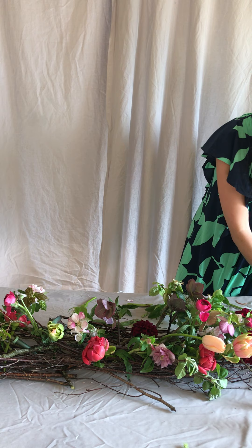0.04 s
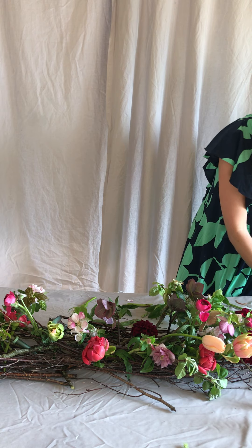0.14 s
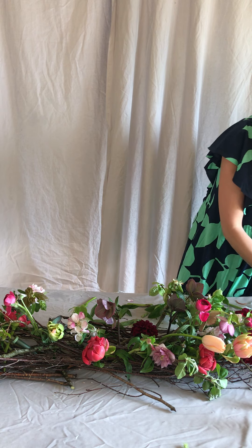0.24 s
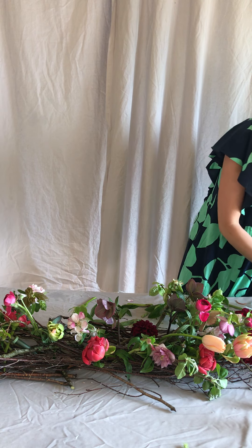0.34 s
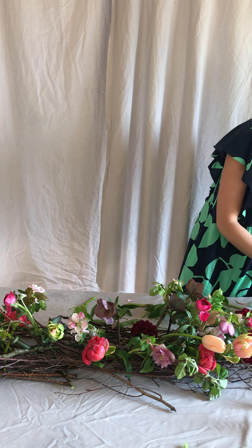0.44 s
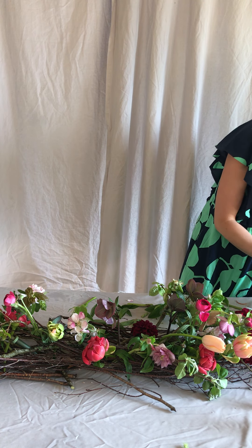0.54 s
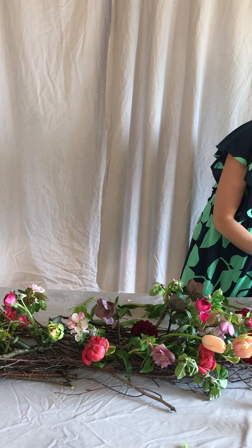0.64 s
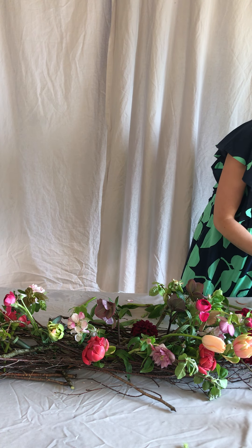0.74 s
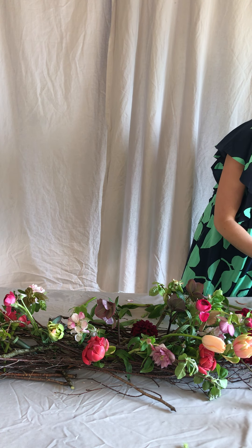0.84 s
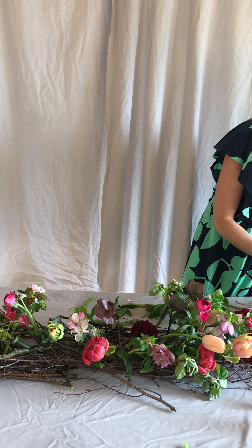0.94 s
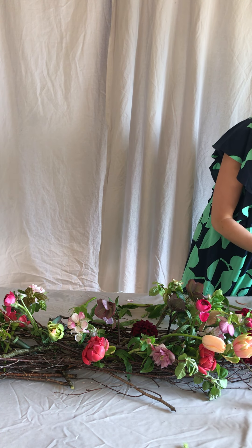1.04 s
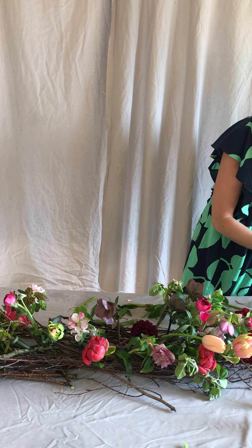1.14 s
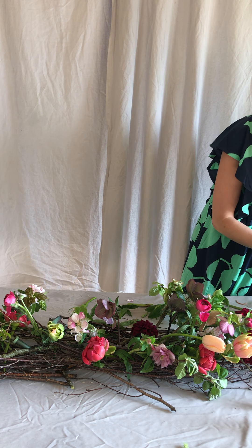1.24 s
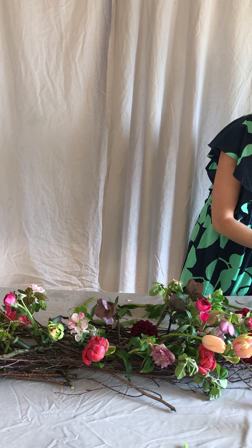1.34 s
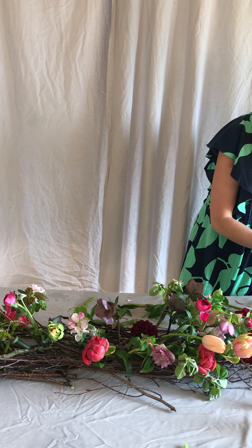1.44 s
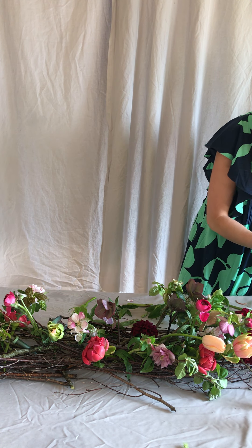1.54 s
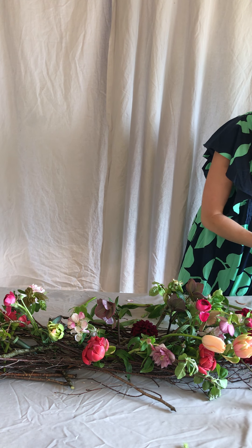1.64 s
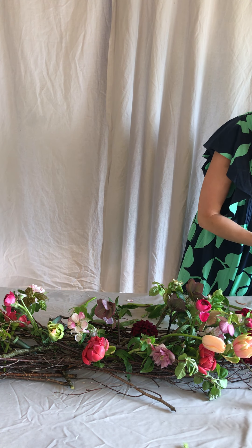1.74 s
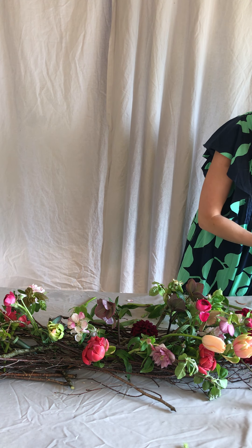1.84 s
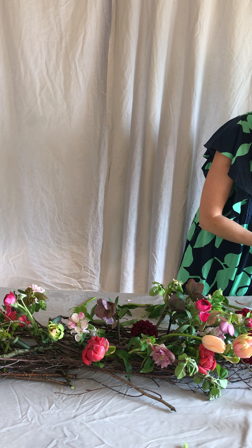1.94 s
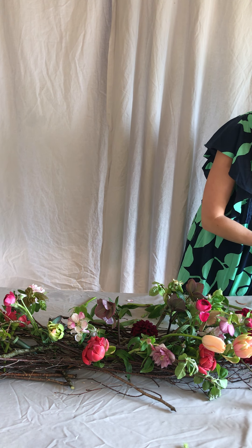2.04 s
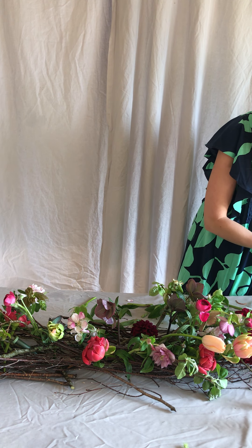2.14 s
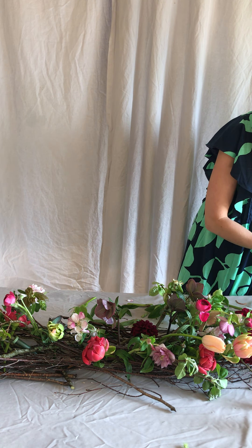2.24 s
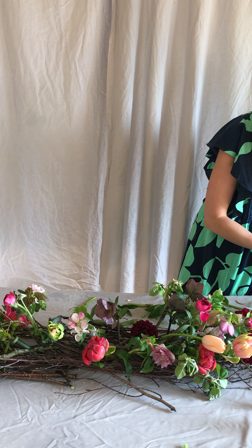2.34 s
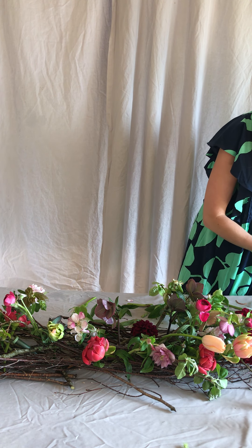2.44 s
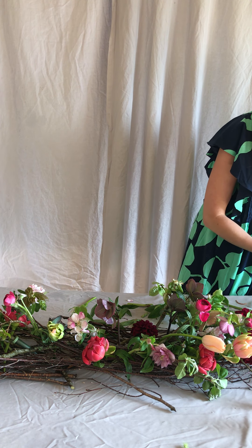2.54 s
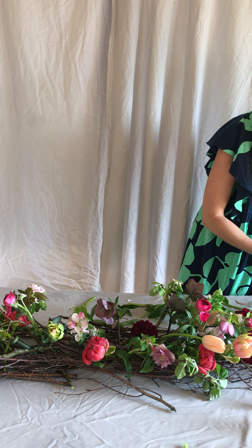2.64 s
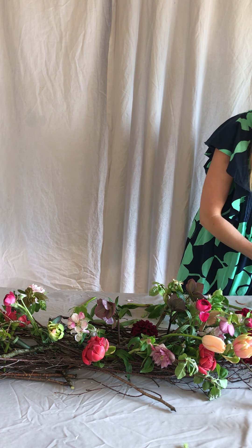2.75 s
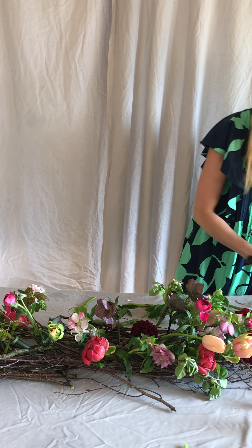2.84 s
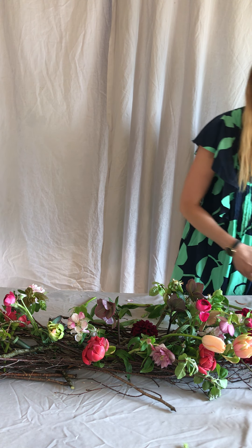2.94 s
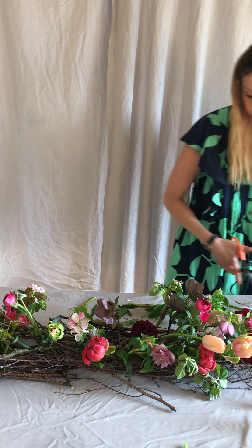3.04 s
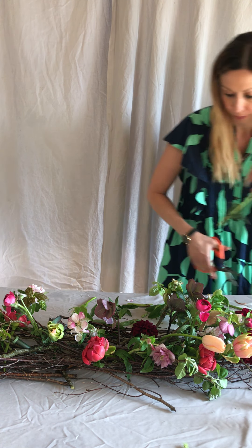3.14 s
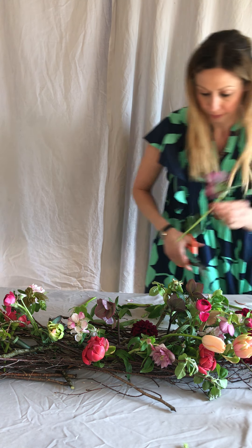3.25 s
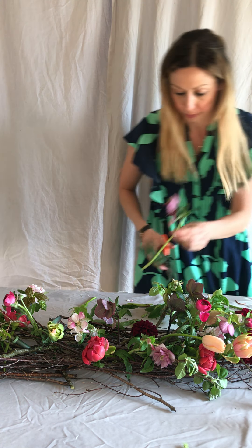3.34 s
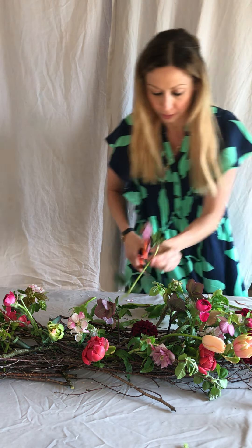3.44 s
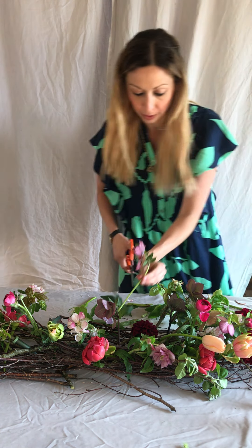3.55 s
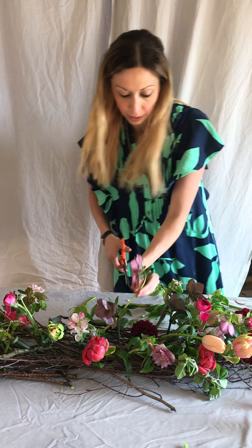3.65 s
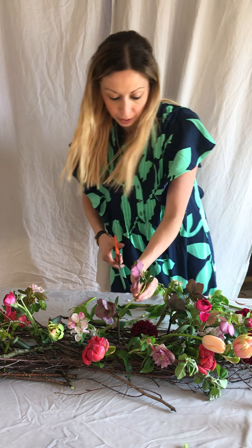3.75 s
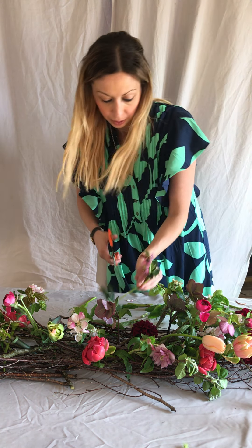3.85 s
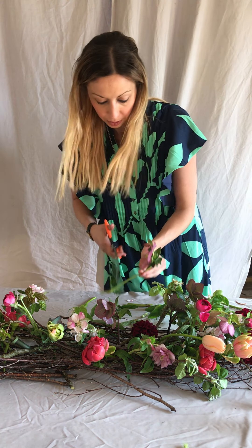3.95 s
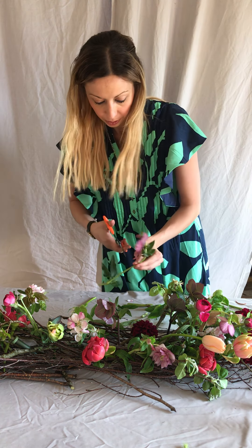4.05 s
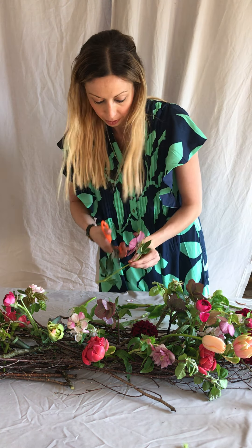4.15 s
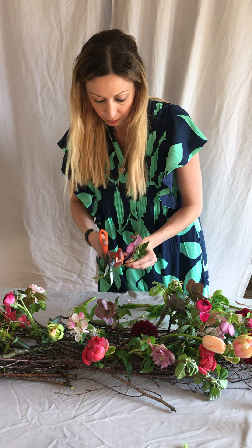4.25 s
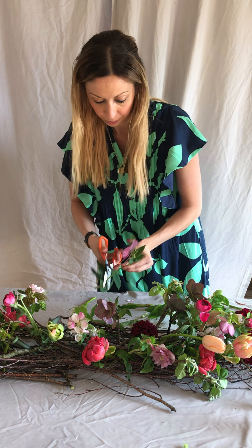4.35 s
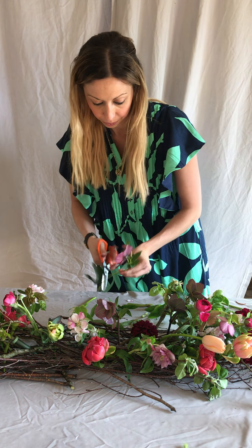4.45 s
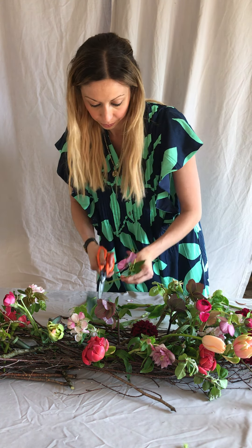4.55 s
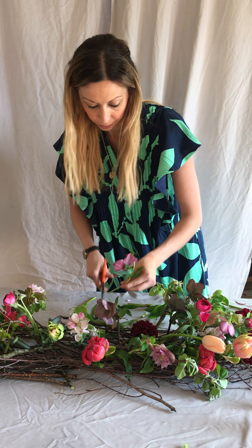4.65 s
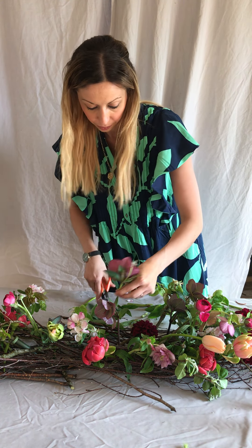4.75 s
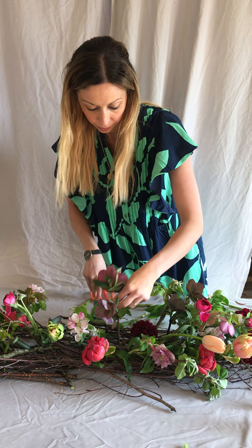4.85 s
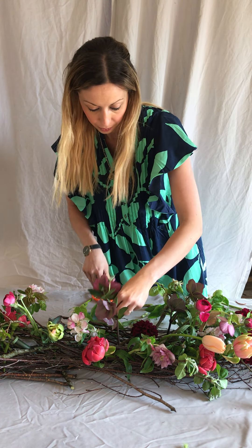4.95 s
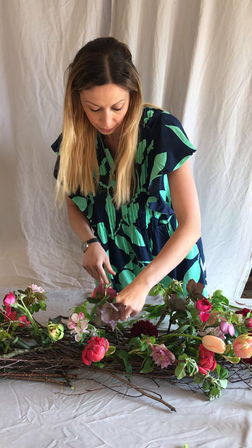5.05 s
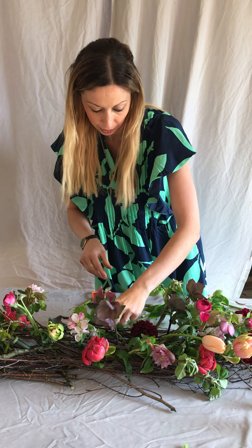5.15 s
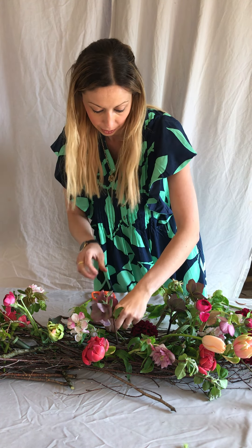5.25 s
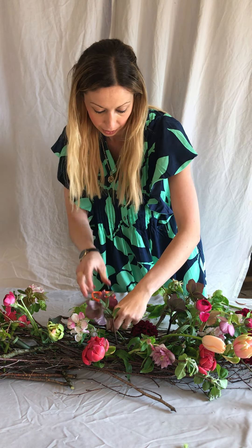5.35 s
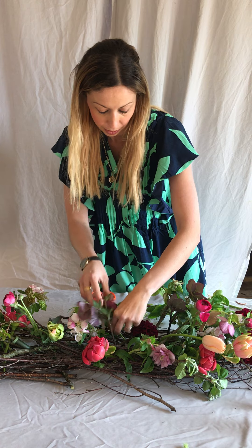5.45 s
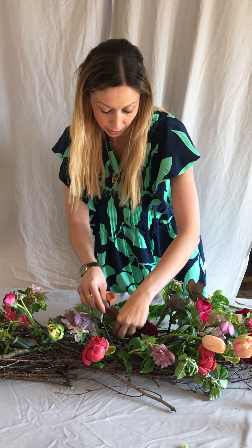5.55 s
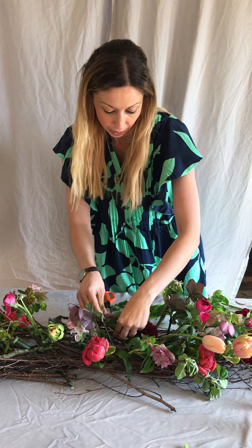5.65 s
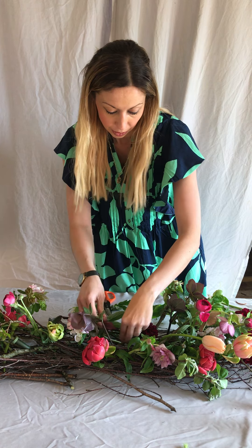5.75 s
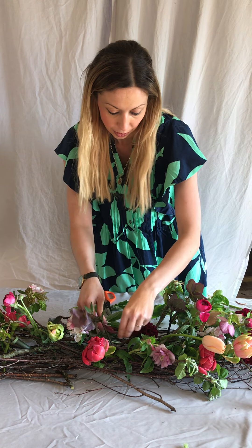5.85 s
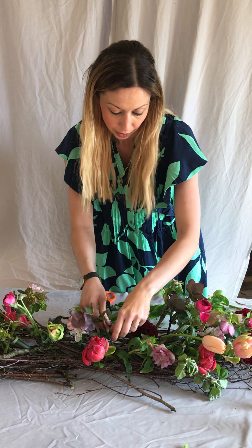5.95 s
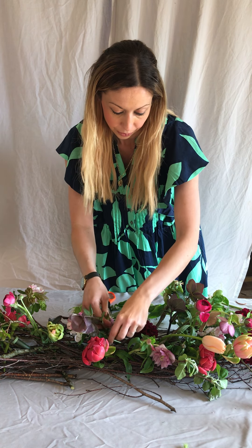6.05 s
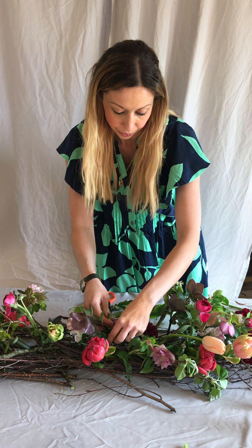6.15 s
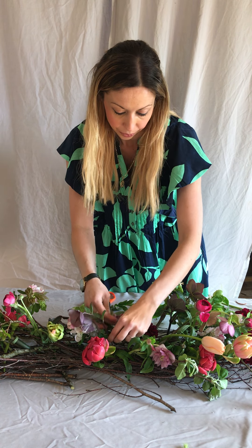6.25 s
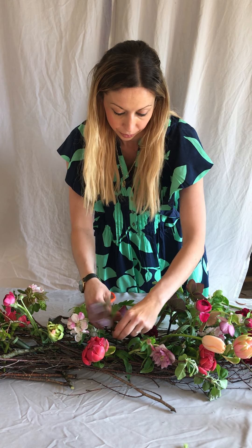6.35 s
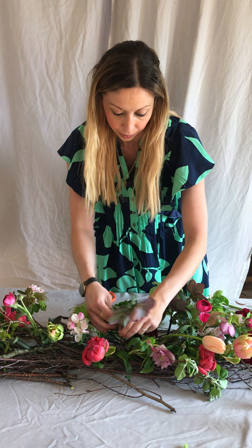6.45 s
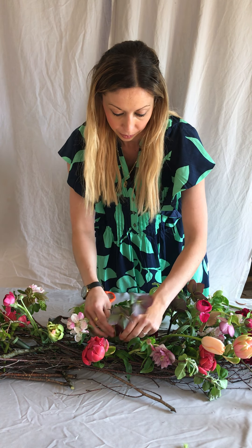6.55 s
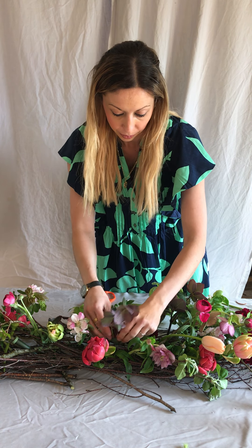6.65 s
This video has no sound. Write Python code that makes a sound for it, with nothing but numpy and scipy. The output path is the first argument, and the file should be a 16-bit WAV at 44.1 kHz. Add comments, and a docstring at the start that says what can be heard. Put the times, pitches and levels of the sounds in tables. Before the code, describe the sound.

Snips crack through flower stems amid faint leaf rustle, then drop and clatter on a table in a bare room.

```python
"""Over a faint hum and hiss, flower stems crack under a pair of snips while leaves and a dress rustle.
Each crack is a quick run of breaking fibres; the rustle is thousands of tiny clicks. After faint creaks
and scrapes, a hand thumps the table's board, which rings low. Then the snips are dropped and bounce:
the handles knock and tick, and the loose blades clack. A bare, lively room answers every sound,
and a phone two metres away hears it all."""
import sys
import numpy as np
from scipy import signal
from scipy.fft import rfft, irfft
from scipy.io import wavfile
from scipy.ndimage import uniform_filter1d

SR = 44100
rng = np.random.default_rng(int(sys.argv[2]) if len(sys.argv) > 2 else 0)


def master_out(mix):
    """Clip the mix to full scale and print it as 16-bit PCM to the path in sys.argv[1]."""
    frames = np.transpose(np.atleast_2d(mix))
    ceiling = np.clip(frames, -1, 1)
    pcm = np.round(ceiling * 32767).astype(np.int16)
    wavfile.write(sys.argv[1], SR, pcm)


N = 295359


def gain(db):
    """Turn decibels into a number to multiply by."""
    return 10 ** (np.asarray(db) / 20)


def normalise(x):
    """Scale a sound to an average power of 1."""
    return x / np.sqrt(np.mean(x ** 2))


def read_curve(hz, table):
    """Read between (pitch, value) points, giving every octave equal space."""
    pitches, values = np.array(table).T
    return np.interp(np.log(np.maximum(hz, 1)), np.log(pitches), values)


def band(x, hz, width_hz):
    """One resonance: keep the sound near one pitch."""
    return signal.lfilter(*signal.iirpeak(hz, hz / width_hz, fs=SR), x)


def dull(x, top_hz):
    """Gently soften the treble, from 19000 Hz at the highest."""
    return signal.lfilter(*signal.butter(1, min(top_hz, 19000), fs=SR), x)


def cut_bass(x, hz, order):
    """Remove the lows; a higher order cuts more steeply."""
    return signal.sosfilt(signal.butter(order, hz, "high", fs=SR, output="sos"), x)


def add(track, start_s, sound):
    """Mix a sound into a track at the given time."""
    i = int(start_s * SR)
    track[i:i + len(sound)] += sound[:N - i]


def impacts(ms, clean_start=False):
    """A dying run of tiny impacts that favours no pitch; a clean start adds one opening click."""
    fade = np.exp(-np.arange(4096) / (SR * max(ms, .15) / 2000))
    fade /= np.linalg.norm(fade)
    run = rng.standard_normal(len(fade)) * fade
    if clean_start:
        run[0] += 1 / np.sqrt(max(ms, 1))  # stands out less in a long run
    ceiling = np.abs(run) + .4 * fade
    ceiling /= np.linalg.norm(ceiling)
    for _ in range(8):  # make all pitches equally strong, then bring back the fading shape
        spectrum = rfft(run)
        run = irfft(spectrum / (np.abs(spectrum) + 1e-12), len(fade))
        run = np.clip(run, -ceiling, ceiling)
    return run / np.linalg.norm(run)


# The tone of the background noise: (pitch [Hz], relative level [dB])
HUM_TONE = [(15, -25.5), (25, 1.5), (87, 0.5), (259, -8), (313, -5.5), (399, -14), (687, -10.5),
            (1280, -18.5), (1980, -17), (10400, -27.5), (14000, -21), (15200, -23.5), (16500, -27)]
def hum_and_hiss(level_db=-67.5):
    """The house hums and the microphone hisses, both steadily."""
    tone = gain(read_curve(np.fft.rfftfreq(N, 1 / SR), HUM_TONE))
    noise = irfft(rfft(rng.standard_normal(N)) * tone, N)
    return gain(level_db) * normalise(noise)


# Stems cracking, small clicks of the snips, and a faint scrape:
# (time [s], level [dB], brightest pitch [Hz], boost at that pitch [dB], length [ms])
CRACKS_AND_SCRAPE = [(0.023, -48, 12300, 4, 0.47), (0.241, -53.5, 12500, 4, 8), (0.303, -62, 7000, 31, 8.9),
                     (0.359, -56, 4700, 20, 6), (0.39, -60, 3500, 13.5, 5.7), (0.449, -62, 2000, 22, 97),
                     (0.503, -49.5, 5960, 34, 0.73), (0.585, -59, 6500, 15, 3.4),
                     (0.739, -55, 5030, 8, 4.7), (0.755, -58, 3960, 16, 11), (1.163, -54, 12000, 19, 1.6),
                     (1.383, -51.5, 6100, 6, 1.6), (1.464, -48.5, 8200, 2, 4.1), (1.55, -53, 9000, 4, 3.3),
                     (1.604, -56, 3200, 15, 2.6), (1.625, -62, 3300, 12, 3.5), (1.635, -58, 4000, 5, 4.4),
                     (1.65, -67, 7200, 5, 3.5), (1.822, -50, 7600, 9, 0.94), (1.828, -44, 6030, 5, 2),
                     (2.205, -57.5, 7100, 5, 13), (2.5984, -44, 9600, 14, 9.4), (2.612, -45.5, 9500, 7, 12),
                     (2.662, -35.5, 8800, 13, 20), (2.667, -39, 11000, 13, 7.7), (2.669, -33, 6500, 7, 13),
                     (2.6737, -13.5, 12500, 26, 0.97), (2.6732, -21.5, 4820, 9, 1.1),
                     (3.002, -51.5, 3900, 6.5, 8.3), (3.117, -57.5, 7600, 8, 3.7),
                     (3.182, -49, 10200, 8, 1.9), (3.282, -56.5, 6000, 5, 13),
                     (3.406, -54.5, 4300, 31, 5.5), (3.569, -55, 8100, 5, 3.3),
                     (3.924, -58.5, 8150, 30, 2.5), (4.003, -63, 7800, 20, 2),
                     (4.4417, -46.5, 9700, 7, 6.8), (4.459, -45, 9550, 3, 1.1),
                     (4.47, -34.5, 11600, 5.5, 2.2), (4.514, -57, 12380, 8.5, 1),
                     (4.523, -45, 10080, 8.5, 33), (4.53, -33, 12760, 8.5, 1.7),
                     (4.5417, -28, 10660, 6, 3.2), (4.545, -46, 4500, 11, 11.4),
                     (4.8083, -41.5, 6000, -3, 3), (5.091, -54.5, 13300, 6, 7.3),
                     (5.584, -54, 7030, 1.5, 1.1), (6.047, -62.5, 6450, 14, 20), (6.183, -55, 9100, 0, 1.4),
                     (6.299, -52, 3640, 6, 0.85), (6.120, -66, 4200, 22, 30), (6.371, -50, 3330, 7, 0.91)]
def cracks_and_scrape():
    """Fibres break in a fast run, splintering with one brighter region; the longest run is a scrape."""
    out = np.zeros(N)
    for start_s, db, hz, boost_db, ms in CRACKS_AND_SCRAPE:
        run = impacts(ms, clean_start=True)
        bright = band(band(run, hz, .45 * hz), hz, .45 * hz)
        top_hz = 3.1 * hz
        splinter = dull(dull(cut_bass(run, 2700, order=3), top_hz), top_hz)
        sound = splinter + (gain(boost_db) - 1) * bright
        peak = np.sqrt(2 * np.max(uniform_filter1d(sound ** 2, size=24)))
        add(out, start_s, gain(db) * sound / peak)
    return out


def crackle(per_second, spread_db):
    """Many tiny clicks of uneven size."""
    sizes = gain(spread_db * np.minimum(rng.exponential(size=N), 3)) * rng.standard_normal(N)
    return normalise(sizes * (rng.random(N) < per_second / SR))


def catch_and_slip(per_second=18, depth_db=2.5):
    """A loudness that wanders as leaves catch and slip."""
    hold = int(SR / per_second)
    steps = np.repeat(rng.standard_normal(N // hold + 1), hold)
    wander = uniform_filter1d(steps, size=hold // 2)[:N]
    return gain(depth_db * normalise(wander))


# Movements of leaves and cloth, with levels before the overall trim:
# (time [s], length [s], leaf level [dB], extra crispness [dB], cloth level [dB], floor level [dB])
MOVEMENTS = [(0.057, 0.073, -69.5, 3, -71, -73), (0.267, 0.13, -63.5, 4, -66.5, -70),
             (0.41, 0.17, -68, 2, -79, -63.5), (0.546, 0.17, -71, 5.5, -68, -69),
             (0.673, 0.069, -65.5, 7.5, -67, -68), (0.837, 0.29, -86, 21, -85, -71),
             (1.168, 0.1, -64, 1, -66, -102), (1.402, 0.24, -66.5, 3.5, -70, -67),
             (1.549, 0.11, -73.5, 15.5, -67, -85), (1.662, 0.13, -69, 4.5, -62.5, -65),
             (1.78, 0.11, -66, 3.5, -83, -93), (1.893, 0.19, -64, -4.5, -69, -66),
             (2.173, 0.047, -73, 4, -95, -97), (2.431, 0.032, -65, -8, -65, -95),
             (2.971, 0.033, -75.5, 20.5, -58.5, -69), (3.275, 0.03, -77.5, 9, -64, -80),
             (3.363, 0.15, -65.5, -4, -66, -77), (3.714, 0.05, -83, 13, -84, -82),
             (5.639, 0.21, -85, 16, -73, -88.5), (5.946, 0.17, -91, 21, -93, -95.5),
             (6.101, 0.023, -88, 24, -94, -81), (6.367, .03, -80, 0, -65, -71)]
def rustle(trim_db=-10, settle_s=0.029):
    """Leaves crackle, cloth shuffles lower down, and the floor rumbles as weight shifts."""
    t, power = np.arange(N) / SR, np.zeros((4, N))
    for start_s, length_s, leaf_db, crisp_db, cloth_db, floor_db in MOVEMENTS:
        swell_s = 0.016 + 0.16 * length_s  # longer movements swell more slowly
        swell = np.clip((t - start_s) / swell_s, 0, 1)
        settle = np.exp(-np.maximum(t - start_s - length_s, 0) / settle_s)
        levels = gain([leaf_db, leaf_db + crisp_db, cloth_db, floor_db])
        power += np.outer(levels, swell * settle) ** 2
    leaves = crackle(3500, spread_db=2.5) * catch_and_slip()
    soft_leaves = normalise(band(band(leaves, 2520, 3200), 3330, 3845))
    crisp_leaves = normalise(band(band(leaves, 6630, 10660), 6300, 10300))
    cloth = normalise(band(band(crackle(600, spread_db=2), 420, 680), 420, 720))
    floor = normalise(band(band(rng.standard_normal(N), 83, 110), 89, 120))
    layers = np.array([soft_leaves, crisp_leaves, cloth, floor])
    return gain(trim_db) * np.sum(np.sqrt(power) * layers, axis=0)


def push(contact_ms):
    """The force of a touch rises and falls; a longer contact wakes fewer high notes."""
    ms = np.arange(.5, 400) / SR * 1000
    force = np.sin(np.pi * np.minimum(ms / contact_ms, 1))
    return force / force.sum()


def ring(notes, swing=1, detune=0):
    """A struck part's fading notes, never quite the same; a negative swing flips every other one."""
    t = np.arange(int(SR * max(ring_s for _, _, ring_s in notes))) / SR
    spread_db = 1.5 * rng.standard_normal(len(notes))
    shift = 1 + detune * rng.standard_normal(len(notes))
    out = np.zeros(len(t))
    for k, (hz, db, ring_s) in enumerate(notes):
        fade = gain(db + spread_db[k] - 60 * t / ring_s)
        out += swing ** k * fade * np.sin(2 * np.pi * hz * shift[k] * t)
    return out


# The notes of the table's board: (pitch [Hz], relative level [dB], time to fade by 60 dB [s])
BOARD_NOTES = [(119.3, -3.5, 0.23), (137, -3, .25), (152.1, -4.5, 0.32), (168.1, -13.5, 0.58),
               (210, -6, 0.14), (259, -16, 0.22), (280, -17, 0.065), (300, -13, 0.15), (324, -13, 0.13),
               (342.6, -5, 0.074)]
# The notes of the snips' handles: (pitch [Hz], relative level [dB], time to fade by 60 dB [s])
HANDLE_NOTES = [(260, -1.5, 0.012), (407, -10, 0.06), (496, -34.5, 0.032), (592, -8.5, 0.039),
                (687.5, 4, 0.025), (830, -1.5, 0.022), (980, -1, 0.026), (1090, -5.5, 0.024),
                (1296, -1.5, 0.013), (1570, -0.5, 0.0083), (2010, 4, 0.011), (2690, -0.5, 0.019),
                (3050, -7.5, 0.0019)]
# The pitches the blades add to a clack: (pitch [Hz], width [Hz], relative level [dB])
BLADE_TONES = [(1620, 350, 2.5), (2373, 77, 16), (3190, 830, 4), (4450, 350, 2), (5600, 320, 10.5),
               (6200, 550, 8), (7070, 250, 6), (9900, 3100, 3), (13100, 1700, 3.5)]
# Knocks on the table, and faint creaks and scrapes:
# (time [s], board strength [dB], handle strength [dB], clack strength [dB],
# clack treble limit [Hz], extra blade ring [dB], contact time [ms], rattle length [ms])
KNOCKS_AND_CREAKS = [(0.33, -87, -66.5, -90, 2000, 0, 0.46, 30),
                     (0.385, -96, -67.5, -88, 2000, 0, 0.44, 11), (0.462, -90, -68, -90, 2000, 0, 0.53, 18),
                     (0.824, -76, -56, -91, 3000, 0, 0.63, 12.6), (2.675, -89, -49, -83, 2457, -2, 0.86, 2),
                     (2.876, -90, -55, -66, 2000, -1.5, 0.41, 9.7),
                     (3.365, -63, -96, -95, 2000, -2, 1.04, 9.7),
                     (4.149, -35, -57, -27.5, 3000, -5.5, 0.79, 51),
                     (4.526, -94, -62, -31, 2500, 2, 0.072, 15),
                     (4.548, -84.5, -68, -76.5, 3000, -11, 0.76, 17),
                     (4.629, -71.5, -50.5, -59, 1990, -2, 0.52, 35),
                     (4.715, -78.5, -81, -92, 2005, 4, 0.59, 53),
                     (4.799, -67, -44, -75, 1983, 4.5, 1.2, 28),
                     (4.8078, -46.5, -24.5, -15, 3000, 7, 0.78, 3),
                     (4.8156, -55, -23.5, -42, 1990, -16, 0.78, 1.55),
                     (4.838, -72, -47, -68.5, 1500, -8, 0.63, 1.3),
                     (4.873, -75, -43, -66.5, 1460, 1, .8, 2),
                     (4.882, -50.5, -33, -64, 1500, 4, 0.42, 0.67),
                     (4.905, -77, -43, -64.5, 1500, 3, .9, 2),
                     (4.9412, -35.5, -32.5, -22.5, 5460, 5, 0.19, 4),
                     (4.9445, -47, -24.5, -9, 6700, 3.5, 0.31, 7.6),
                     (5.022, -65, -32, -70, 1990, 3, 0.48, 3.7),
                     (5.054, -45.5, -34, -70, 2004, 0, 0.91, 1.33),
                     (6.4562, -59, -57, -27, 18850, 6.5, 0.13, 14),
                     (6.474, -75, -47, -84, 2020, 3, 1.3, 27)]
def knocks_and_creaks():
    """A push rings the board and handles, and the loose snips rattle on; faint runs sound like creaks."""
    board, snips = np.zeros(N), np.zeros(N)
    for time_s, board_db, handle_db, clack_db, top_hz, blade_db, push_ms, rattle_ms in KNOCKS_AND_CREAKS:
        force = push(push_ms)
        rattle = impacts(rattle_ms)
        blades = sum(gain(db + blade_db) * band(rattle, hz, width) for hz, width, db in BLADE_TONES)
        clack = dull(dull(dull(rattle + blades, top_hz), top_hz), top_hz)
        touches = 1.46 * impacts(rattle_ms, clean_start=True)
        thump = signal.fftconvolve(ring(BOARD_NOTES, swing=-0.97), force)
        handles = signal.fftconvolve(ring(HANDLE_NOTES, detune=.012), signal.fftconvolve(force, touches))
        add(board, time_s, gain(board_db) * thump)
        add(snips, time_s, gain(handle_db) * handles)
        add(snips, time_s, gain(clack_db) * clack)
    return cut_bass(board, 98, order=4), cut_bass(snips, 340, order=2)  # small parts give off no bass


# The notes of the handle's tip: (pitch [Hz], relative level [dB], time to fade by 60 dB [s])
TIP_NOTES = [(2044, -2, 0.02), (2400, -12.5, 0.0059), (2920, -9.5, 0.0068)]
# The tip touching the table: (time [s], strength [dB], contact time [ms])
TIP_TOUCHES = [(2.871, -57, 0.32), (4.8063, -22.5, 0.2), (4.8752, -26, 0.28), (4.9414, -14, 0.28)]
def handle_ticks():
    """The hard tip gives a short, woody tick at each touch; a softer touch sounds duller."""
    out = np.zeros(N)
    for start_s, db, contact_ms in TIP_TOUCHES:
        add(out, start_s, gain(db) * np.convolve(ring(TIP_NOTES), push(contact_ms)))
    return out


# How long the room rings: (pitch [Hz], time to fade by 60 dB [s])
ROOM_FADE = [(100, 0.56), (260, 0.83), (700, 0.86), (1840, 0.75), (4850, 0.58), (9000, 0.55), (14000, 0.28)]
# How strongly the room rings: (pitch [Hz], relative level [dB])
ROOM_TONE = [(100, 4), (300, 4), (600, 1.5), (1100, 7), (2000, -5), (5000, -1), (9000, -5.5), (12500, -3.5),
             (15000, -7.5)]
def room_tail():
    """Countless echoes blur into noise that dies away at its own speed for each pitch."""
    t = np.arange(int(1.2 * SR)) / SR
    out = np.zeros(len(t))
    for hz in 80 * 2 ** np.arange(0, 7.7, .5):  # half an octave apart
        noise = band(band(rng.standard_normal(len(t)), hz, hz / 2), hz, hz / 2)
        dying = noise * gain(-60 * t / read_curve(hz, ROOM_FADE))
        share = .35 * hz / (SR / 2)  # higher bands are wider, so they hold more energy
        out += gain(read_curve(hz, ROOM_TONE)) * np.sqrt(share) * dying / np.linalg.norm(dying)
    return out * np.clip((t - .003) / 0.0012, 0, 1)  # echoes thicken over the first moments


# Echoes off nearby surfaces, one list for hands beside the table, one for its middle among soft drapes:
# (delay [ms], level [dB], treble limit [Hz])
FIRST_ECHOES = [
    [(1.2, -30, 18000), (2.9, -20, 9300), (7.7, -15, 39000), (14.8, -9.5, 15000)],
    [(1.0, -40, 14000), (6.8, -15.5, 7500), (13.5, -15.5, 8100)],
]
def room(x, step_in_s=3.3):
    """The direct sound, the tail, and first echoes that switch when the hands move over the table."""
    out = x + signal.fftconvolve(x, room_tail())[:N]
    beside = np.arange(N) < step_in_s * SR
    for here, echoes in zip((beside, ~beside), FIRST_ECHOES):
        for ms, db, top_hz in echoes:
            add(out, ms / 1000, gain(db) * dull(here * x, top_hz))
    return out


# Resonances of the phone's microphone opening: (pitch [Hz], width [Hz], boost or cut [dB])
OPENING_TONES = [(4390, 8600, 2), (10460, 1000, -9.5), (12400, 5100, 3.5)]
def microphone_opening(x):
    """The small opening lifts some high pitches and weakens others."""
    for hz, width_hz, db in OPENING_TONES:
        x = x + (gain(db) - 1) * band(x, hz, width_hz)
    return x


def scene():
    """Play every sound in the room, then add the hum and hiss."""
    board, snips = knocks_and_creaks()
    ticks = handle_ticks()
    tick_share = gain(-6.5)  # the ticks are shaded from the walls
    in_room = room(snips + tick_share * ticks + cracks_and_scrape() + rustle() + gain(1.5) * board)
    direct = board + (1 - tick_share) * ticks  # the board's ring also comes straight through the table
    return (microphone_opening(in_room + direct) + hum_and_hiss())[None]


def record(dry):
    """The phone drops the deepest bass and cuts the highest treble."""
    treble_cut = signal.ellip(8, .2, 60, 15850, fs=SR, output="sos")
    return signal.sosfilt(treble_cut, cut_bass(dry, 40, order=2))


dry = scene()
out = record(dry)
master_out(out)
```